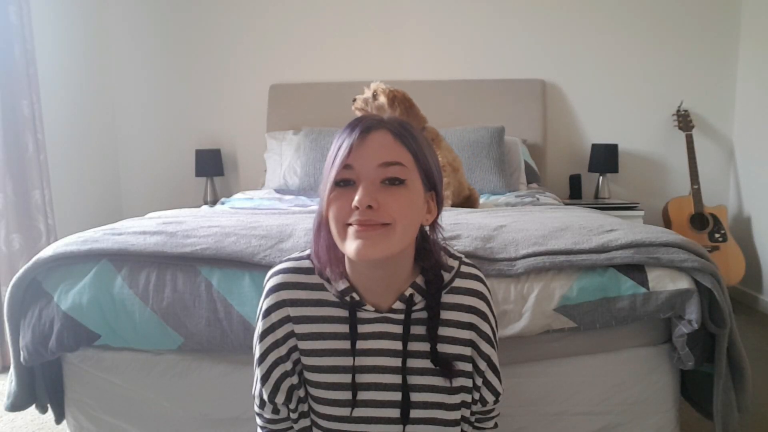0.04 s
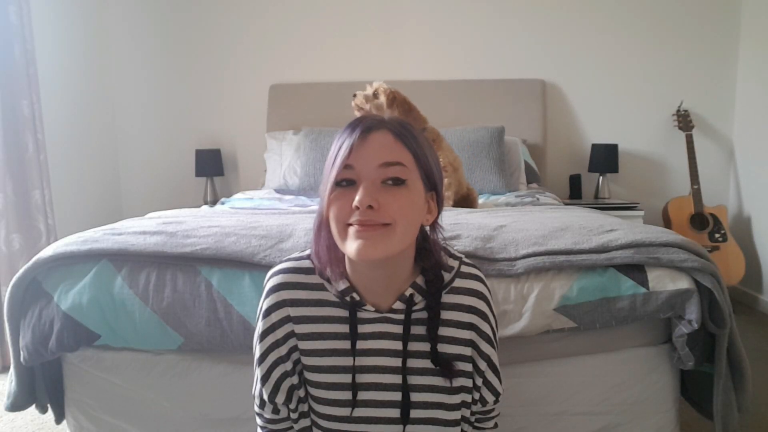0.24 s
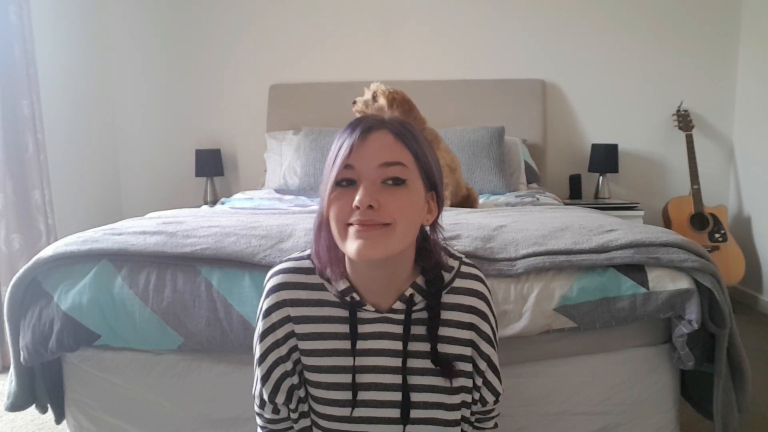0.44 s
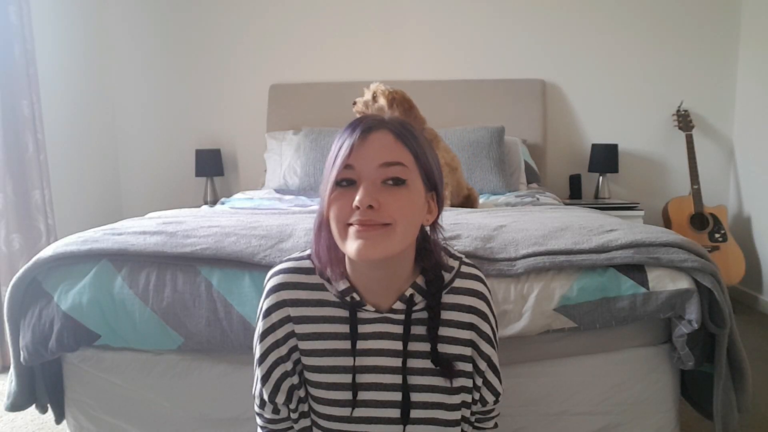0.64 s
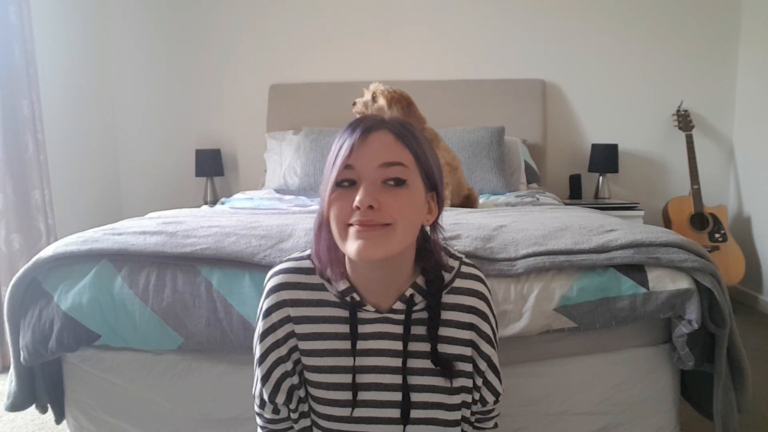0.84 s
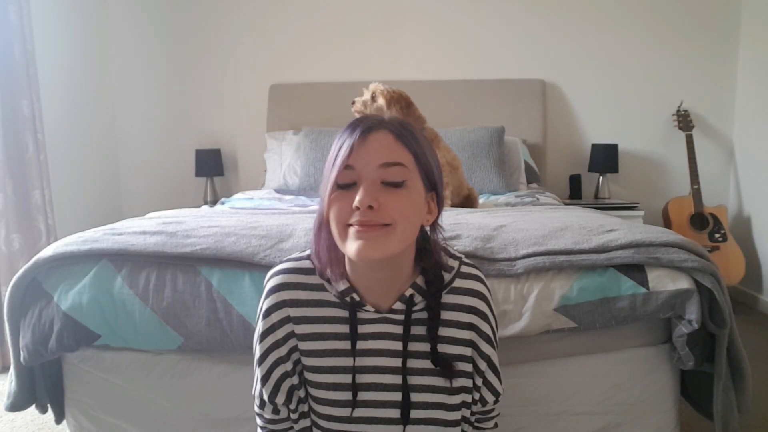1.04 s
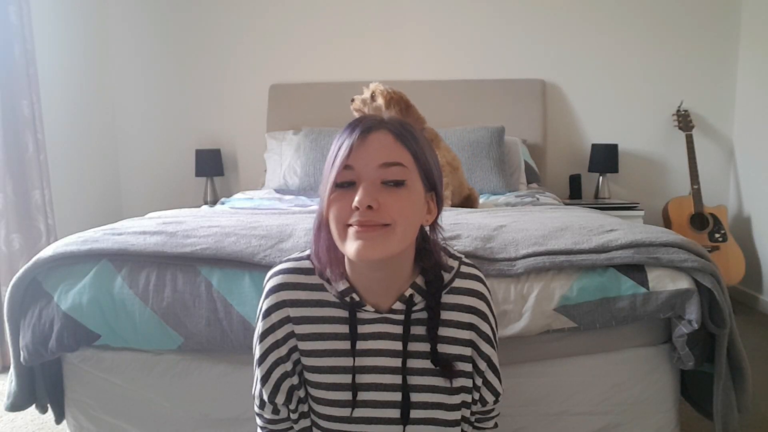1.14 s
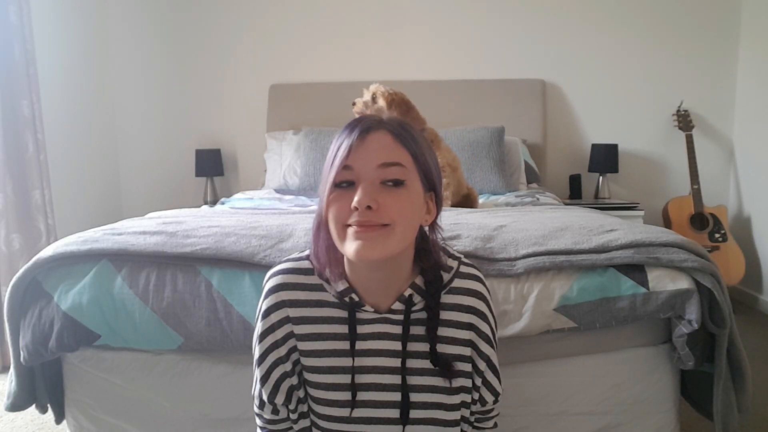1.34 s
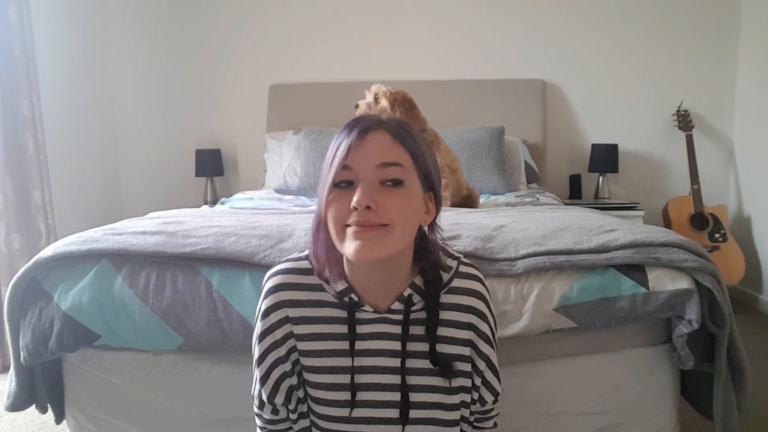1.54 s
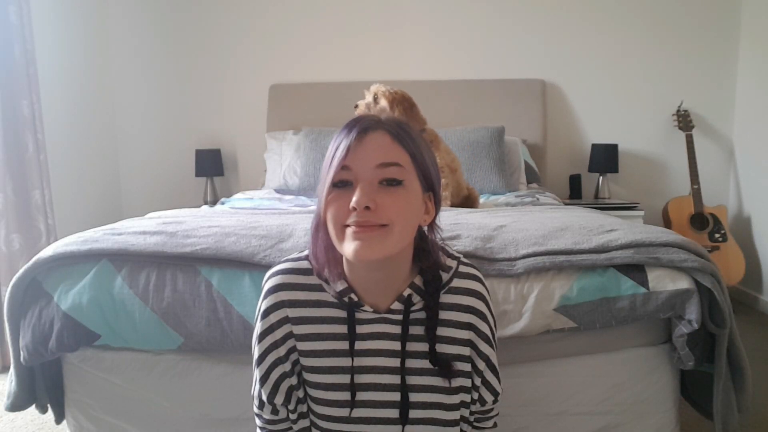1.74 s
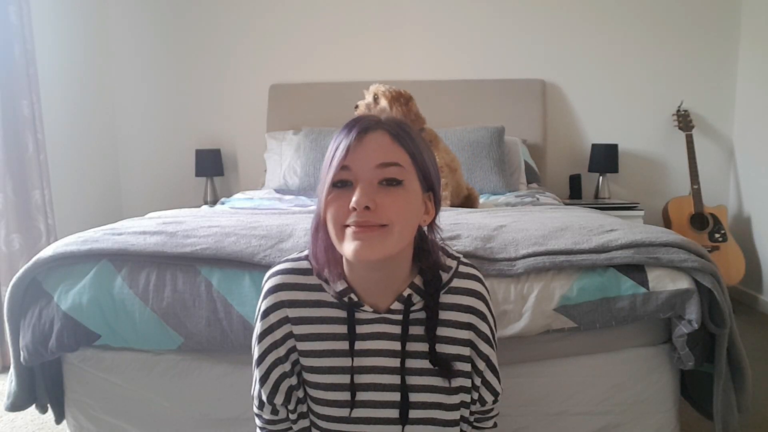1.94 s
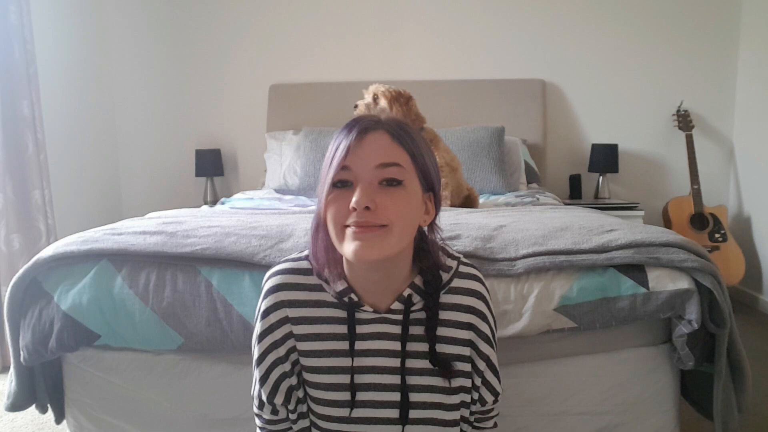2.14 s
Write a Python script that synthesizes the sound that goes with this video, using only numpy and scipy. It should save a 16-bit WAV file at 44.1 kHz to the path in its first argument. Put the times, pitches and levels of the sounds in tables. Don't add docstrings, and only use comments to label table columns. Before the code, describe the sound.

Two short, high barks of a small dog about a second apart, each rising out of a brief growl and ringing in a furnished bedroom; close stereo pickup, faint hiss and very low motor throb.

```python
import sys
import numpy as np
from scipy import signal
from scipy.fft import rfft, irfft
from scipy.io import wavfile
from scipy.ndimage import uniform_filter1d, minimum_filter1d

SR = 44100
rng = np.random.default_rng(int(sys.argv[2]) if len(sys.argv) > 2 else 0)


def waveform_to_disk(signal):
    frames = np.transpose(np.atleast_2d(signal))
    scaled = np.clip(frames, -1, 1) * 32767
    samples = np.round(scaled).astype(np.int16)
    wavfile.write(sys.argv[1], SR, samples)


def boost_factor(decibels):
    exponent = np.asarray(decibels, float) / 20
    return 10 ** exponent


N = 97020


def dog():
    voice, air = barks()
    voice += growls()
    # start_s, level_db, pitch_hz, width_hz
    pop = (1.073, -38, 650, 90)
    add(voice, pop[0], lip_pop(*pop[1:]))
    voice = cut(cut(voice, 75, "high"), 5800, "low")
    return voice + teeth_rasp(air)


def barks():
    # time_s, pitch_hz, effort_db, mouth_opening_db, roughness (0-1)
    bark_tables = [
        [(.17, 281.3, -34, -25, 0.4), (.205, 341.3, -22, -4, 0.5), (.232, 478.8, -13.5, 1, 0.4),
         (.262, 612.4, -10.5, 1, .2), (.292, 640, -15, 4.5, 0.5), (.33, 539.8, -20, 6, .45),
         (.362, 424.4, -26, 1.5, 0.6), (.395, 244, -36, -5.5, 0.4), (.42, 169.5, -40.5, 2, .5)],
        [(1.155, 272.2, -29.5, -25, 0.7), (1.19, 327.4, -21, -7, .45), (1.218, 488.7, -16.5, 2.5, 0.4),
         (1.245, 633.5, -2.5, -5.5, 0.3), (1.275, 566.1, -15, 6.5, .3), (1.305, 511.8, -22, 7, 0.5),
         (1.335, 418.9, -21.5, 2.5, .5), (1.365, 307.2, -24.5, 2.5, 0.4), (1.385, 240, -42, -6, 0.4)],
    ]
    # pitch_hz, width_hz, level_db
    throat_tones = [(1017.5, 180, 6), (1645, 380, -9), (2112, 200, -22), (2643, 205, -12), (3920, 540, -44)]
    chest_width_hz, throat_low_hz = 275, 627
    extra_noise = 0.53
    shut = 0.7
    out, air = np.zeros(N), np.zeros(N)
    for bark in np.array(bark_tables):
        t, hz, pulses, puffs, gate, level = folds(bark, bark[:, 4], count=14)
        mouth = boost_factor(np.interp(t, bark[:, 0], bark[:, 3]))
        chest = resonate(pulses + puffs, hz, chest_width_hz)
        chest = evened(resonate(chest, hz, 2 * chest_width_hz))
        lift = np.minimum(level * boost_factor(19.5), 1)
        opened = np.maximum.accumulate(np.minimum(level * boost_factor(17), 1))
        shift = shut + (1 - shut) * opened
        drive = pulses + puffs + extra_noise * evened(puffs)
        throat = cut(through(drive, throat_tones, lift, shift), throat_low_hz, "high")
        add(out, t[0], level * (chest + mouth * throat))
        add(air, t[0], gate * (level * mouth * boost_factor(16.5)) ** 0.71)
    return out, air


def growls():
    # time_s, pulse_rate_hz, effort_db
    growl_tables = [
        [(0, 101.5, -39.5), (.05, 113.1, -44.5), (.11, 147.1, -39), (.175, 166.3, -32.5), (.205, 182.5, -42.5)],
        [(1.05, 62.56, -70), (1.085, 62.4, -45.5), (1.13, 63.7, -38.5), (1.17, 69, -32), (1.195, 75.5, -41)],
    ]
    growl_roughness = [.45, .35]
    hum_levels = [-7.5, -29.5]
    # pitch_hz, width_hz, level_db
    chest_tones = [(151, 150, -2.5), (320, 183, 5), (640, 480, -18), (910, 150, -17.5), (1500, 430, -36)]
    out = np.zeros(N)
    for growl, rough, hum_db in zip(growl_tables, growl_roughness, hum_levels):
        t, hz, pulses, puffs, _, level = folds(growl, rough, count=28)
        hum = boost_factor(hum_db) * evened(resonate(pulses + puffs, hz, 53))
        chest = through(pulses + puffs, chest_tones, 1, 0.94)
        add(out, t[0], level * (chest + hum))
    return out


def folds(table, rough, count):
    jitter, puff_share, fade_s = 0.12, 0.18, 0.004
    rows = np.array(table)
    t = np.arange(rows[0, 0], rows[-1, 0], 1 / SR)
    noise = rng.standard_normal((2, len(t)))
    hz = np.interp(t, rows[:, 0], rows[:, 1])
    db = np.interp(t, rows[:, 0], rows[:, 2])
    rough = np.clip(np.interp(t, rows[:, 0], rough * np.ones(len(rows))), 0, 1)
    wobble = evened(uniform_filter1d(noise[0], size=150))
    turns = np.cumsum(hz * (1 + jitter * rough * wobble)) / SR
    pulses = sum(np.cos(2 * np.pi * k * turns) for k in range(1, count))
    gate = 0.51 + np.exp(-(turns % 1) / puff_share)
    since_start = t - t[0] + (t[0] < .01)
    ends = np.clip(np.minimum(since_start, t[-1] - t) / fade_s, 0, 1)
    puffs = rough * evened(gate * noise[1]) * 2
    return t, hz, (1 - rough) * evened(pulses), puffs, gate, ends * boost_factor(db)


def through(drive, tract, lift, shift):
    parts = []
    for k, (hz, width, db) in enumerate(tract):
        parts.append((-1) ** k * boost_factor(db) * resonate(drive, hz * shift, width))
    return (parts[0] + lift * sum(parts[1:])) / np.std(sum(parts))


def lip_pop(level_db, pitch_hz, width_hz):
    t = np.arange(0, .03, 1 / SR)
    decay = np.pi * width_hz * t
    return boost_factor(level_db) * np.sin(2 * np.pi * pitch_hz * t) * decay * np.exp(1 - decay)


def teeth_rasp(air):
    # pitch_hz, level_db (per Hz)
    rasp_color = [(3200, -8), (4500, -7), (5200, -12.5), (6500, -4.5), (7500, -19), (8700, -2.5),
                  (9600, -17.5), (11000, -11)]

    def gain(hz):
        top_db = -10.5 * np.clip((hz - 11000) / 1500, 0, 1)
        return boost_factor(read(rasp_color, hz) + top_db) * (hz > 2500)

    return boost_factor(-49) * air * evened(shaped(rng.standard_normal(N), gain))


def bedroom(x):
    # pitch_hz, decay_s
    walls = [(120, 0.14), (320, 0.31), (840, 0.53), (2200, 0.46), (5800, 0.77), (12000, 0.21)]
    tone_pitches = [425, 512, 551, 600, 635, 890, 930, 974, 1012, 1097, 1137, 1181, 2024, 2654]
    # level_db, decay_s (60 dB)
    tone_decays = [(-6.5, 0.45), (-17, 0.78), (-19, .65), (-14.5, .5), (-2.5, 0.5), (-7, 0.81), (-7.5, 0.6),
                   (2.5, .58), (2.5, 0.49), (-2, 0.56), (-7.5, 0.52), (-13.5, 0.82), (-2.5, 0.72),
                   (-13, 0.72)]
    # pitch_hz, likeness (-1 to 1)
    room_likeness = [(100, 0.93), (400, 0.93), (800, 0.53), (2000, 0), (10000, 0.54)]
    tail_db, tones_db = -4, -24.5
    early_db, early_decay_s = 9.5, .12
    taps = np.zeros((2, SR))
    at = np.arange(200, SR - 20, 20) + rng.integers(0, 20, (2, (SR - 201) // 20))
    np.put_along_axis(taps, at, rng.choice([-1., 1.], at.shape), 1)
    hz, t, z = signal.stft(taps, SR, nperseg=256)
    late = boost_factor(-60 * t / read(walls, hz)[:, None])
    early = boost_factor(early_db - 60 * t / early_decay_s)
    tail = signal.istft(z * (late + early), SR, nperseg=256)[1][:, :SR]

    t = np.arange(SR) / SR
    tones = np.zeros((2, SR))
    for pitch_hz, (db, decay_s) in zip(tone_pitches, tone_decays):
        phase = rng.uniform(0, 2 * np.pi, (2, 1))
        tones += boost_factor(db - 60 * t / decay_s) * np.sin(2 * np.pi * pitch_hz * t + phase)
    tones = tones * np.minimum(t / 0.0027, 1)
    room = boost_factor(tail_db) * tail / np.linalg.norm(tail[0])
    room = room + boost_factor(tones_db) * tones / np.linalg.norm(tones[0])
    return signal.fftconvolve(x[None], paired(*room, room_likeness), axes=1)[:, :N]


def motor_throb():
    # multiple of the turning rate, level_db
    multiples = [(1, -62.5), (2, -74.5), (3, -75.5), (4, -88.5)]
    turn_hz, waver = 26.2, .025
    drift = evened(shaped(rng.standard_normal((5, N)), lambda hz: (hz > 0) * (hz < 6)))
    turns = np.cumsum(turn_hz * (1 + waver * drift[0])) / SR
    throb = np.zeros(N)
    for (k, db), swell in zip(multiples, drift[1:]):
        throb += boost_factor(db + 1 + 0.66 * swell) * np.sin(2 * np.pi * k * turns)
    return throb * boost_factor(np.array([[-.5], [.5]]))


def hiss():
    # pitch_hz, level_db (per Hz)
    hiss_color = [(40, -11.5), (70, -11), (150, -14.5), (500, -23), (2500, -27), (8000, -40), (12500, -36),
                  (15900, -38)]
    # pitch_hz, likeness (-1 to 1)
    hiss_likeness = [(60, 0.63), (240, 0.94), (950, 0.92), (3770, 0.61), (15000, 0.5)]
    noise = shaped(rng.standard_normal((2, N)), lambda hz: boost_factor(read(hiss_color, hz)) * (hz > 35))
    return boost_factor(-71) * evened(paired(*noise, hiss_likeness))


def evened(x):
    return x / np.sqrt(np.mean(x ** 2) + 1e-20)


def read(points, hz):
    f, value = np.transpose(points)
    return np.interp(np.log(hz + 1), np.log(f + 1), value)


def shaped(x, gain):
    return irfft(rfft(x) * gain(np.fft.rfftfreq(x.shape[-1], 1 / SR)), x.shape[-1])


def add(mix, s, sound):
    part = mix[round(max(s, 0) * SR):][:len(sound)]
    part += sound[:len(part)]


def resonate(x, hz, width):
    turn = np.exp(2j * np.pi * np.cumsum(hz * np.ones(len(x))) / SR)
    r = np.exp(-np.pi * width / SR)
    smooth = signal.lfilter([(1 - r) ** 2], [1, -2 * r, r * r], x / turn + 1e-18)
    return 2 * (turn * smooth).real


def paired(a, b, likeness):
    def same(hz):
        return np.clip(read(likeness, hz), -1, 1)

    together = shaped(a, lambda hz: np.sqrt((1 + same(hz)) / 2))
    apart = shaped(b, lambda hz: np.sqrt((1 - same(hz)) / 2))
    return np.array([together + apart, together - apart])


def cut(x, hz, kind):
    return signal.sosfilt(signal.butter(4, hz, kind, fs=SR, output="sos"), x)


def scene():
    # pitch_hz, level_db
    straight_path = [(200, -5), (600, -3.5), (1100, -1), (3000, -3.5), (10000, -10.5)]
    x = dog()
    direct = shaped(x, lambda hz: boost_factor(read(straight_path, hz)))
    lean = boost_factor(0.73 * np.array([[-1], [1]]))
    return direct * lean + bedroom(x) + motor_throb() + hiss()


def top_cut(x):
    return signal.sosfilt(signal.butter(12, 16080, fs=SR, output="sos"), x)


def record(dry):
    ceiling, limit_s, edge_hz = .9, .004, 16200
    span = round(limit_s * SR)
    room_left = np.minimum(ceiling / (abs(dry).max(0) + 1e-9), 1)
    room_left = minimum_filter1d(room_left, size=2 * span)
    x = dry * uniform_filter1d(uniform_filter1d(room_left, size=span), size=span)
    low_pass = signal.firwin(511, edge_hz, window=("kaiser", 9), fs=SR)
    mix = signal.oaconvolve(x, low_pass[None], "same")
    return top_cut(mix)


dry = scene()
out = record(dry)
waveform_to_disk(out)
```